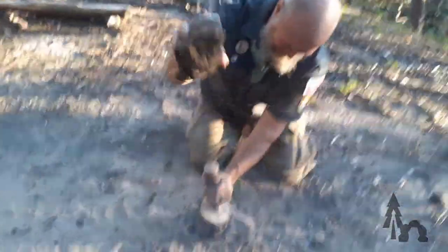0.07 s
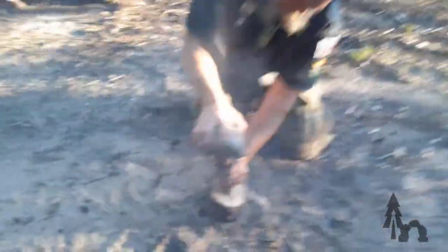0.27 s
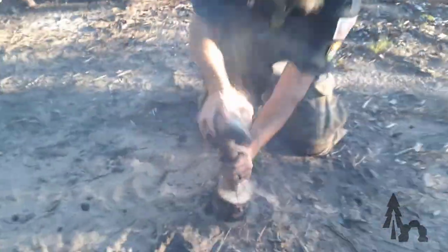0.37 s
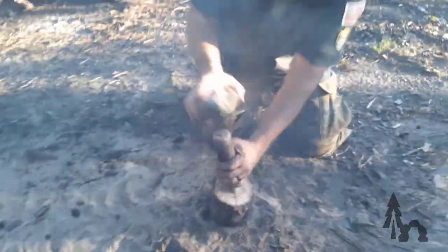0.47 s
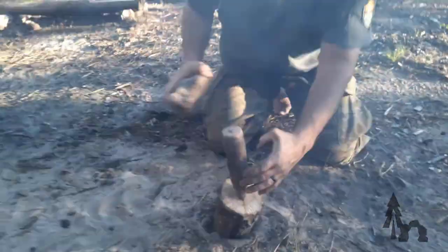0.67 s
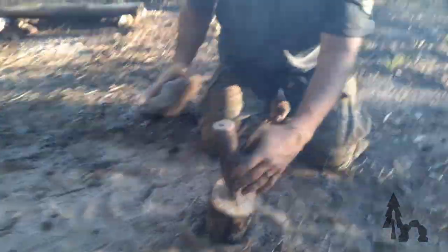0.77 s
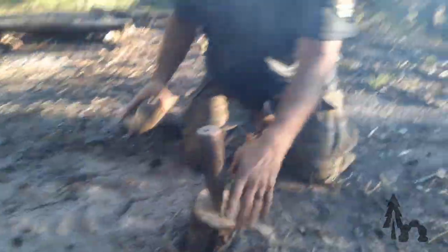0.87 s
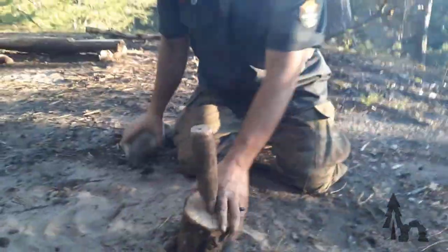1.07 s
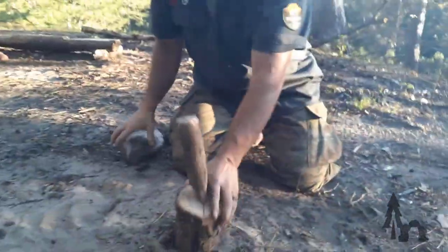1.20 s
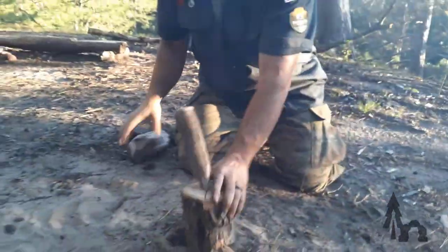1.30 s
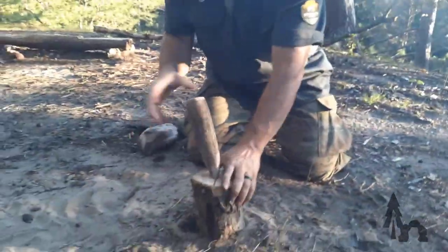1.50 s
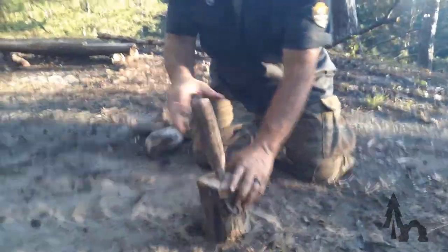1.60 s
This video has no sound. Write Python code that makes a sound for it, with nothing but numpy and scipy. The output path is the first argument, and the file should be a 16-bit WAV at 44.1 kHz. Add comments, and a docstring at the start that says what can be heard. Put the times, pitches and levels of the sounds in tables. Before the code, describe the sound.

A rock hits a wooden stake once at about 0.2 seconds, just after a faint sleeve swish and air pop. The close, sharp, slightly overloaded knock carries a low thud and echoes through the woods while grit patters until 0.6. A very faint, thin, distant whistle sounds around 1 second. The rock is set softly on soil at 1.2, then rubbing and small bumps near the microphone run from 1.3 to 1.6.

```python
"""A rock strikes a wooden stake standing in a log, in a wood. The impact excites the stake's damped modes
and overloads the close microphone; the log thuds into the ground, the trees scatter the sound back and
grit patters down. A sleeve swishes and air pops on the microphone during the swing. Afterwards the rock
is put down on the soil, a thin far whistle sounds over quiet air, and something rubs by stick-slip
friction and bumps close to the microphone."""
import sys
import numpy as np
from scipy import signal
from scipy.fft import rfft, irfft
from scipy.io import wavfile

SR = 44100
rng = np.random.default_rng(int(sys.argv[2]) if len(sys.argv) > 2 else 0)


def pcm_store(signal):
    """Save signal as 16-bit PCM."""
    levels = np.round(np.clip(np.atleast_2d(signal), -1, 1) * 32767)
    wavfile.write(sys.argv[1], SR, levels.astype(np.int16).T)


N = 72765
KNOCK_S, CONTACT_S = .2282, .0011  # moment and rise time of the impact


def amp(db):
    """Decibels to amplitude ratio."""
    return 10 ** (np.asarray(db) / 20)

def clock():
    """Time of each sample in seconds."""
    return np.arange(N) / SR

def unit(x):
    """Normalisation to rms 1."""
    return x / np.sqrt(np.mean(x ** 2))

def curve(rows):
    """Envelope through (time_s, level_db) points."""
    return amp(np.interp(clock(), *np.array(rows).T))

def pan(db):
    """Left and right gains for a level difference."""
    return amp(np.array([[db], [-db]]) / 2)

def spread(pair, width):
    """Mid-side stereo from two uncorrelated signals."""
    return unit(pair[0] + width * pair[1] * np.array([[1], [-1]]))

def noise(width):
    """Stereo white noise."""
    return spread(rng.standard_normal((2, N)), width)

def grains(per_s, width):
    """Shot noise: a stereo stream of random impulses."""
    return spread(rng.standard_normal((2, N)) * (rng.random(N) < per_s / SR), width)

def colour(x, points):
    """Spectral shaping by (frequency_hz, gain_db) points, normalised to rms 1."""
    hz, db = np.array(points).T
    bins_hz = np.maximum(np.fft.rfftfreq(2 * N, 1 / SR), 1)
    gain = amp(np.interp(np.log(bins_hz), np.log(hz), db))
    return unit(irfft(rfft(x, 2 * N) * gain)[..., :N])

def butterworth(x, cutoff_hz, kind):
    """Causal filtering with a maximally flat passband."""
    return signal.sosfilt(signal.butter(2, cutoff_hz, kind, fs=SR, output="sos"), x)

def fade(start, t60, rise_s=1 / SR):
    """Exponential decay with a linear onset."""
    age = np.maximum(clock() - start, 0)
    return np.minimum(age / rise_s, 1) * np.exp(-np.log(1000) * age / t60)

def swell(peak_s, rise_s, fall_s):
    """Rounded hump with exponential flanks."""
    age = clock() - peak_s
    return np.exp(1 - np.hypot(1, age / np.where(age < 0, rise_s, fall_s) * np.sqrt(2)))

def swells(rows):
    """Sum of humps, each (peak_s, level_db, rise_s, fall_s)."""
    return sum(amp(db) * swell(s, rise, fall) for s, db, rise, fall in rows)

def ring(start, modes, rise_s=1 / SR):
    """Free vibration as a superposition of damped modes."""
    age = clock() - start
    return sum(amp(db) * fade(start, t60, rise_s) * np.sin(2 * np.pi * hz * age) for hz, db, t60 in modes)


# Spectrum of the still wood: frequency_hz, gain_db
AIR_SPECTRUM = [(25, -9), (80, 2), (250, -6.5), (700, -7.5), (1200, -5), (1800, 1), (2600, -8.5),
                (3600, -6.5), (6000, -16), (11000, -12), (16000, -16.5)]
def air():
    """Stationary broadband noise forms the quiet background."""
    return amp(-65.5) * colour(noise(width=.97), AIR_SPECTRUM)


# Course of the far whistle: time_s, pitch_hz, level_db
WHISTLE_GLIDE = [(.92, 3520, -84), (0.976, 3480, -65), (1.06, 3450, -71), (1.2, 3414, -63.5),
                 (1.33, 3330, -76)]
def whistle(bandwidth_hz=190, depth=.94):
    """Random quadrature modulation widens a slowly sinking tone into a wavering narrow band."""
    times, hz, db = np.array(WHISTLE_GLIDE).T
    phase = 2 * np.pi * np.cumsum(np.interp(clock(), times, hz)) / SR
    waver = lambda: depth * unit(butterworth(noise(width=1), bandwidth_hz / 2, "low"))
    tone = unit((1 + waver()) * np.sin(phase) + waver() * np.cos(phase))
    return tone * np.interp(clock(), times, amp(db), left=0, right=0)


# Rustles under the hand: peak_s, level_db, rise_s, fall_s
LITTER_RUSTLES = [(1.058, -56, 0.0078, 0.0082), (1.15, -59, 0.033, 0.1), (1.293, -57.5, 0.016, 0.0085)]
# Spectrum of dry litter: frequency_hz, gain_db
LITTER_SPECTRUM = [(500, -19), (2000, -3.5), (5000, -4.5), (7500, -10), (9500, 0.5), (12000, -6),
                   (16000, -14)]
def litter():
    """Many tiny clicks of dry litter merge into shot noise, heard as rustling."""
    return colour(grains(per_s=5200, width=1), LITTER_SPECTRUM) * swells(LITTER_RUSTLES)


# Crunches under the log, later the rock: peak_s, level_db, rise_s, fall_s
SOIL_CRUNCHES = [(.268, -31.5, .002, 0.0055), (.631, -59, 0.0015, 0.0054), (1.161, -52.5, 0.0018, 0.0066),
                 (1.179, -37.5, 0.0024, 0.0036), (1.22, -62.5, 0.049, 0.046)]
# Spectrum of crushed soil: frequency_hz, gain_db
SOIL_SPECTRUM = [(120, -1), (240, 5), (550, 2), (900, -4), (1500, -2.5), (3000, -22.5), (7000, -19),
                 (11000, -15.5), (16000, -24)]
def soil():
    """Granular soil yields under load in bursts of dull noise."""
    return colour(noise(width=.25), SOIL_SPECTRUM) * swells(SOIL_CRUNCHES)


# The rock on the soil, then handling bumps: peak_s, level_db, pitch_hz, rise_s, fall_s
SOFT_IMPACTS = [(1.171, -41, 121.2, 0.0035, 0.0088), (1.189, -35.5, 111, 0.0025, 0.0092),
                (1.215, -46.5, 70, 0.012, .01), (1.354, -35, 100.5, 0.0071, 0.0075),
                (1.426, -53, 108, .01, 0.0093), (1.488, -40.5, 74, 0.017, .014),
                (1.625, -32.5, 86, 0.0098, .012)]
def thumps():
    """Soft, heavily damped impacts give low pulses a few cycles long."""
    return sum(amp(db) * swell(s, rise, fall) * np.cos(2 * np.pi * hz * (clock() - s))
               for s, db, hz, rise, fall in SOFT_IMPACTS)


# Rubbing strokes: peak_s, body_db, hiss_db, rise_s, fall_s
RUB_STROKES = [(1.343, -40, -45, 0.0073, 0.0081), (1.415, -61, -45, .004, 0.0057),
               (1.483, -42, -42.5, 0.014, 0.018), (1.563, -76, -40.5, 0.0081, 0.011),
               (1.6005, -35.5, -45, 0.0022, 0.0087), (1.619, -40.5, -50, .007, 0.006),
               (1.643, -51, -45, 0.0028, 0.012)]
# Light contact between strokes: time_s, level_db
SLIDE_LEVELS = [(1.27, -84), (1.32, -50.5), (1.38, -49.5), (1.44, -55.5), (1.52, -47), (1.59, -45.5),
                (1.65, -40)]
# Modes of the rubbed casing: pitch_hz, relative_db, t60_s
CASING_MODES = [(470, -2, .028), (600, -3.5, 0.023), (1110, -5, 0.018), (1400, -7.5, .014),
                (1723, -2.5, 0.019), (2700, -8, 0.013), (3213, -5, 0.012), (4570, -8, .012),
                (5150, -11, .01), (6700, -12.5, 0.017), (8700, -9.5, .014)]
# Spectrum of the friction hiss: frequency_hz, gain_db
HISS_SPECTRUM = [(200, -8.5), (2000, -5.5), (5000, -7), (6300, -12.5), (6900, -6.5), (8000, -15.5),
                 (8600, 3), (9300, -3.5), (11000, 0.5), (13000, -3.5), (16000, -10.5)]
def rubbing(slips_per_s=2200, width=.52):
    """Stick-slip friction hisses and drives the casing's resonances with dense impulses."""
    slide = curve(SLIDE_LEVELS)
    pressure = amp(-7) * slide + swells((s, db, rise, fall) for s, db, _, rise, fall in RUB_STROKES)
    speed = slide + swells((s, db, rise, fall) for s, _, db, rise, fall in RUB_STROKES)
    response = butterworth(ring(0, CASING_MODES), cutoff_hz=300, kind="high")
    response /= np.linalg.norm(response)
    body = signal.fftconvolve(pressure * grains(slips_per_s, width), response[None])[:, :N]
    hiss = speed * colour(grains(2 * slips_per_s, width), HISS_SPECTRUM)
    return body + hiss


# Firmer taps on the casing: start_s, level_db
CASING_TAPS = [(1.347, -29), (1.5734, -22.5), (1.5994, -32.5)]
def taps(pitch_hz=507, t60_s=.021):
    """Each tap excites a single hollow, damped resonance."""
    return sum(ring(s, [(pitch_hz, db, t60_s)]) for s, db in CASING_TAPS)


# Swishes of the swing: peak_s, level_db, rise_s, fall_s
SLEEVE_SWISHES = [(.01, -54.5, 0.015, .06), (.143, -47, 0.023, .035)]
# Spectrum of the cloth: frequency_hz, gain_db
SLEEVE_SPECTRUM = [(150, -4.5), (600, -1.5), (2000, 4), (3500, -5.5), (7000, -8), (10000, -4), (16000, -7)]
def sleeve():
    """Friction of moving cloth radiates swells of broadband noise."""
    return colour(noise(width=.6), SLEEVE_SPECTRUM) * swells(SLEEVE_SWISHES)


# Strength of the buffeting: time_s, level_db
BUFFET_LEVELS = [(0, -57), (.06, -59.5), (.11, -71.5), (.22, -53), (.27, -35), (.32, -41.5), (.42, -48.5),
                 (.56, -57.5), (.62, -53), (.66, -64), (.82, -78), (1.12, -81), (1.3, -67), (1.42, -54.5),
                 (1.56, -55), (1.65, -42)]
# Spectrum of the buffeting: frequency_hz, gain_db
BUFFET_SPECTRUM = [(20, -29), (45, -8.5), (75, 2.5), (110, -3.5), (160, -4), (250, -21.5), (500, -42),
                   (2000, -76)]
def buffeting():
    """Pressure fluctuations of air moving over the microphone make a low rumble."""
    return colour(noise(width=.5), BUFFET_SPECTRUM) * curve(BUFFET_LEVELS)


def air_pop(start_s=.1657, band_hz=(109.3, 1015)):
    """A pressure impulse on the left microphone port gives a band-limited pop with a sharp tick."""
    impulse = np.diff(fade(start_s, t60=np.inf), prepend=0)
    pop = butterworth(impulse, band_hz, "band")
    tick = amp(-7.5) * impulse
    return amp(-4) * (tick - pop / pop.max()) * amp([[0], [-39.5]])


# Landings of bark and grit: start_s, level_db
DEBRIS_TICKS = [(0.414, -54.5), (.428, -47), (.443, -46), (0.453, -39), (.503, -49), (.552, -43.5),
                (.595, -44.5), (.630, -45), (1.159, -53), (1.18, -34), (1.292, -53)]
# Spectrum of the debris: frequency_hz, gain_db
GRIT_SPECTRUM = [(500, -8.5), (2000, -4), (6000, -10), (10000, 0.5), (13000, 0.5), (16000, -3)]
def debris():
    """Fine grit falls as decaying shot noise; larger bits land as separate transients."""
    spray = amp(-55) * colour(grains(per_s=2500, width=.5), GRIT_SPECTRUM)
    landings = sum(amp(db) * fade(s, t60=.0068) for s, db in DEBRIS_TICKS)
    ticks = colour(noise(width=.7674), GRIT_SPECTRUM) * landings
    return spray * fade(KNOCK_S, t60=1.5, rise_s=.01) + ticks


# Spectrum of the early echo off the trunks: frequency_hz, gain_db
TRUNK_SPECTRUM = [(100, -4.5), (300, -5), (550, -4.5), (1000, -6.5), (1500, 1), (2000, 1), (2800, -12),
                  (4500, -12), (6500, -23), (10000, -20.5), (16000, -30)]
# Spectrum of the late reverberation: frequency_hz, gain_db
REVERB_SPECTRUM = [(150, -7), (350, -12.5), (600, -16), (1200, -7.5), (1900, 1.5), (2800, -9.5),
                   (4500, -17), (7000, -25), (16000, -28)]
def trees(delay_s=.018, late_t60_s=1.35, earlier_blow_s=-.055):
    """Scattering by trunks makes a diffuse echo; the far wood reverberates with this blow and one before."""
    start = KNOCK_S + delay_s
    early = colour(grains(per_s=6000, width=1), TRUNK_SPECTRUM) * fade(start, t60=.45, rise_s=.012)
    tails = amp(-47) * (fade(start, late_t60_s, rise_s=.08) + fade(earlier_blow_s, late_t60_s))
    far_echo = amp(-46.5) * swell(peak_s=.368, rise_s=.022, fall_s=.022)  # off a distant stand of trees
    late = colour(noise(width=1), REVERB_SPECTRUM) * np.hypot(tails, far_echo)  # powers add
    return amp(-29.5) * early + late


# Modes of the log on the soil: pitch_hz, relative_db, t60_s
LOG_MODES = [(68, -1, .115), (118, -10, 0.14), (176, -1.5, .09), (232, -7, .06), (363, -15.5, .05),
             (538.8, -14, 0.11), (680, -20.5, 0.088)]
# The log is driven down, then settles: start_s, level_db, left_minus_right_db
LOG_THUDS = [(0.236, -16, 6.5), (.267, -32.5, -0.5)]
def log_thuds(right_lag_s=.00066):
    """The log vibrates in low, damped modes; their sound reaches the left channel first."""
    thud = lambda s: np.array([ring(s + lag, LOG_MODES, rise_s=.0038) for lag in (0, right_lag_s)])
    return -sum(amp(db) * pan(side_db) * thud(s) for s, db, side_db in LOG_THUDS)


# Spectrum of the rock's crack: frequency_hz, gain_db
CRACK_SPECTRUM = [(2000, -20), (4700, 1), (6400, -9.5), (8400, 2.5), (9400, -2.5), (10300, 0.5),
                  (13000, -8.5), (16000, -14)]
def rock_crack():
    """A brief, hard contact radiates a burst of high-frequency noise."""
    return amp(-12.5) * colour(noise(width=.4), CRACK_SPECTRUM) * fade(KNOCK_S, t60=.014, rise_s=CONTACT_S)


# Modes of the wooden stake: pitch_hz, relative_db, t60_s
STAKE_MODES = [(436, -28.5, 0.041), (783, -24, .026), (1015, -26, 0.022), (1459, -2, .0154),
               (1564, 0.5, .0149), (1728, -10.5, .023), (1998, -11.5, 0.021), (2354, -21, 0.022),
               (3073, -15, 0.0097), (3748, -17.5, .014), (4270, -17, 0.014), (5090, -12, 0.009),
               (7056, -20, 0.0068), (8295, -19, .006)]
# Reflections off the ground and the kneeling body: delay_s, left_db, right_db
NEAR_REFLECTIONS = [(.0039, -23, -24.5), (.0066, -28.5, -21)]
def stake_knock(right_lag_s=.000045):
    """Impact excites the stake's modes; reflection from near surfaces adds delayed copies."""
    t = clock()
    stake = amp(8) * ring(KNOCK_S, STAKE_MODES, CONTACT_S)
    delayed = lambda s: np.interp(t - s, t, stake)
    direct = np.array([stake, delayed(right_lag_s)])
    return direct + sum(amp([[left], [right]]) * delayed(s) for s, left, right in NEAR_REFLECTIONS)


def scene():
    """Linear superposition of all sources at the microphone."""
    blow = stake_knock() + rock_crack() + log_thuds() + trees() + debris()
    swing = sleeve() + air_pop() + buffeting()
    handling = soil() + litter() + thumps() + rubbing() + taps()
    return blow + swing + handling + whistle() + air()


def record(dry, overload_level=.84, knee=8, cutoff_hz=15900):
    """Saturation in the microphone flattens the knock's peaks; a low-pass cuts the highest treble."""
    clipped = dry / (.5 + np.abs(dry / overload_level) ** knee) ** (1 / knee)
    return signal.sosfilt(signal.ellip(8, .2, 70, cutoff_hz, fs=SR, output="sos"), clipped)


dry = scene()
out = record(dry)
pcm_store(out)
```